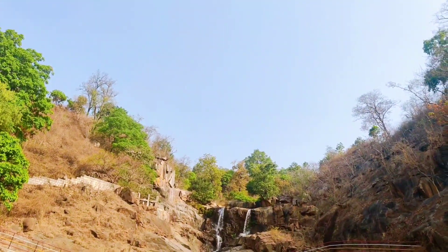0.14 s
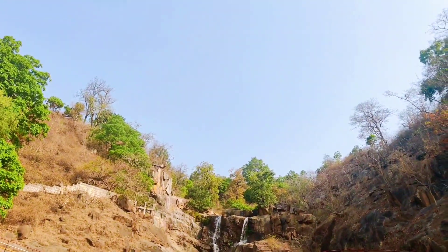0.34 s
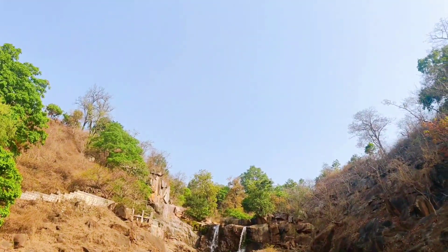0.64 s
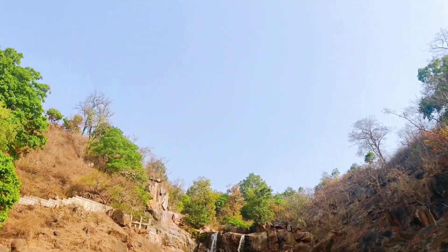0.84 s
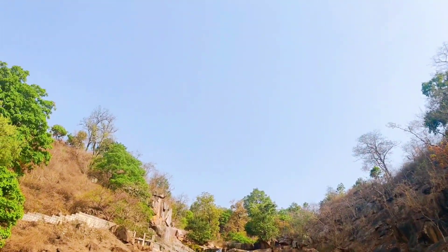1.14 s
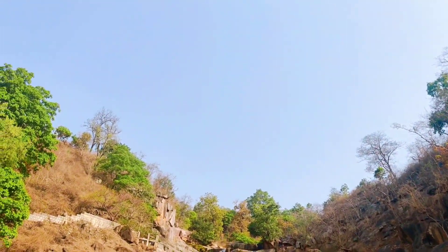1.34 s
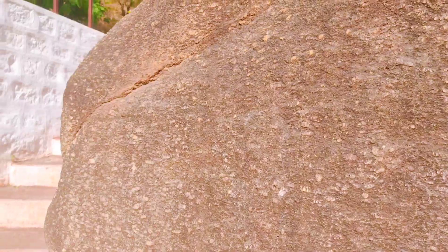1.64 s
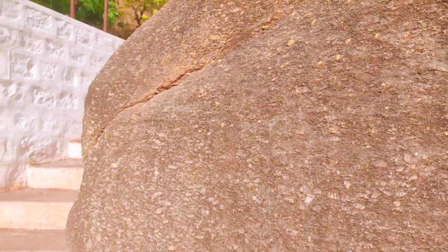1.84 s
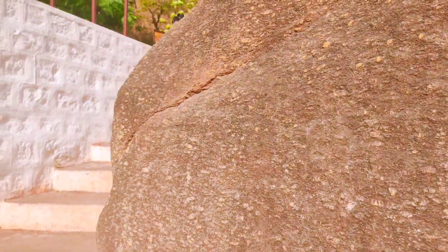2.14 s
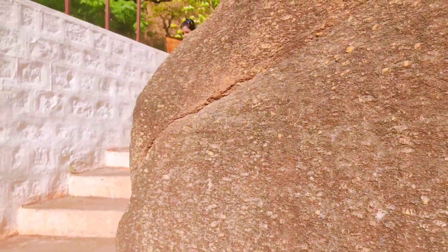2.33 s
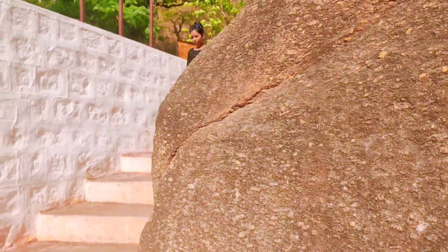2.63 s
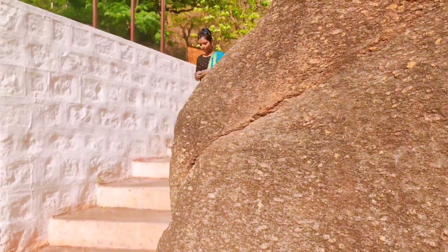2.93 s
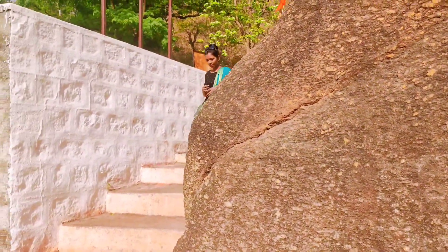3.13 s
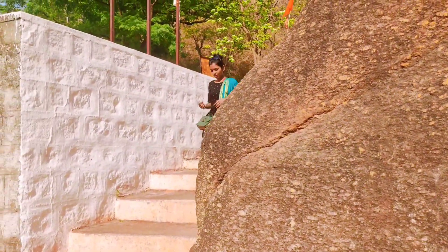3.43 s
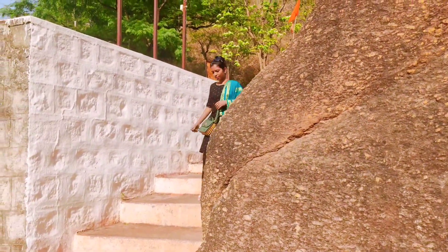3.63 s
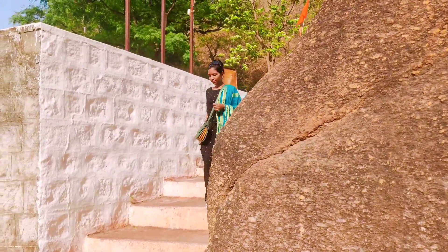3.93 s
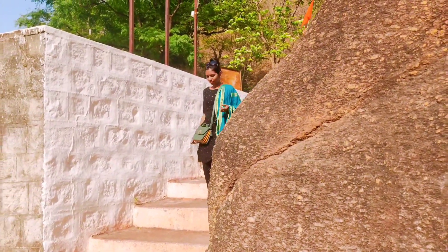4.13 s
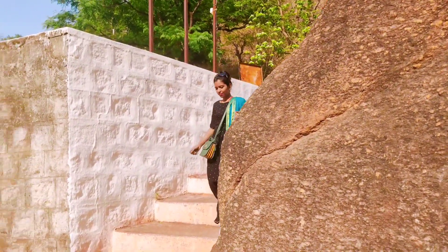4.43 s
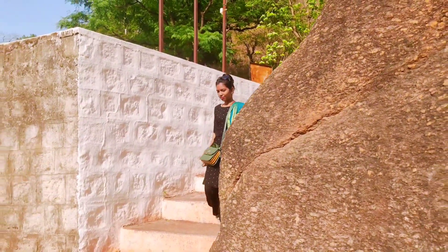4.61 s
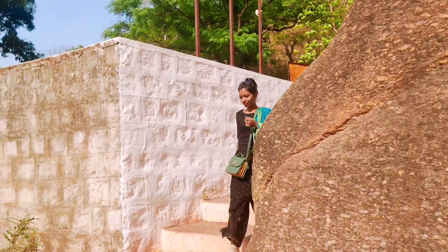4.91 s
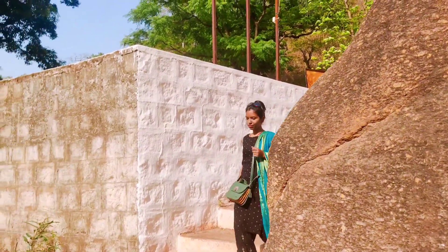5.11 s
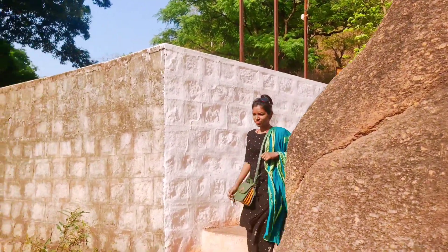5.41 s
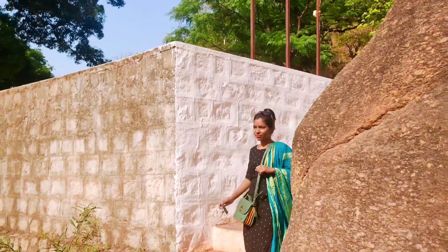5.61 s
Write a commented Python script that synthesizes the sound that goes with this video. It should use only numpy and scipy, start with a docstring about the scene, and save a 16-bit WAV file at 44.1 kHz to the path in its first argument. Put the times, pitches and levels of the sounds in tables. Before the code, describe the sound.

Full, bubbly water pours down rock, stops dead for a moment, and returns more distant among boulders, its treble opening near the end.

```python
"""A small waterfall rushes down a rock face, heard through two microphone ports a hand apart.
After a short silence the rush fades in again from one side, further off among boulders.
Foam noise and ringing bubbles in half-octave bands make the rush, direct and scattered by the rocks.
Gurgles and dull plops ring in it, spray and mist fizz on top, and a breeze and one puff rumble below."""
import sys
import numpy as np
from scipy import signal
from scipy.fft import rfft, irfft
from scipy.io import wavfile
from scipy.ndimage import uniform_filter1d, map_coordinates

SR = 44100
rng = np.random.default_rng(int(sys.argv[2]) if len(sys.argv) > 2 else 0)


def digitize_waveform(pressure):
    """Quantize a signal to 16-bit integers and store it at the path in sys.argv[1].

    Rows of a 2-D input are taken as channels; values are limited to [-1, 1].
    """
    field = np.atleast_2d(pressure).T
    bounded = np.clip(field, -1, 1)
    quanta = np.round(bounded * 32767).astype(np.int16)
    wavfile.write(sys.argv[1], SR, quanta)


N = 254016

# spectrum of the rush at each spot, ahead of the port colours: freq_hz, density_db (dB per Hz)
FRONT_RUSH = [(20, -70), (58, -58.5), (90, -58.5), (140, -58.5), (185, -66.5), (280, -60.5), (380, -63.5),
              (680, -63.5), (950, -68.5), (1600, -69), (3200, -66), (4200, -77), (4800, -73), (5600, -76),
              (7000, -85), (15500, -110)]
ASIDE_RUSH = [(20, -76), (42, -67.5), (80, -60), (200, -65), (270, -65.5), (500, -67), (760, -67.5),
              (980, -70.5), (1400, -72), (2100, -72), (3300, -74), (4400, -74.5), (5600, -80), (7000, -82),
              (9500, -109)]
# direct water relative to scattered water at each spot: freq_hz, ratio_db
FRONT_DIRECT = [(200, -2.5), (700, 7.0), (1700, -6.0), (2400, 8.5), (3100, -7), (3900, 3), (4500, -12.5)]
ASIDE_DIRECT = [(250, 7.0), (750, 9), (1300, 6.0), (2400, 1.0), (3400, 0.5), (5200, -0.5)]
# colour of each port; the left duct rings near 5 kHz: freq_hz, gain_db
LEFT_PORT = [(3500, -0.5), (3900, -2), (4220, -7.5), (4520, -0.8), (4820, 2.5), (5200, 0), (5900, -14.5),
             (8000, -14)]
RIGHT_PORT = [(100, -3.5), (2400, -3.5), (3600, -3.5), (4250, -8), (4750, -4.5), (5300, -1.8), (6000, -4.5),
              (9000, -7.5)]
# further colour of the rush on the right, at each spot: freq_hz, gain_db
FRONT_RIGHT = [(900, 0), (1800, -2.5), (2500, 0.3), (3050, -5.5), (3850, 4.5), (4250, 2.5), (5000, -1)]
ASIDE_RIGHT = [(850, 0), (1250, 0), (1750, -0.8), (2250, 0.5), (2800, 0.4), (3400, 0.3), (4200, -0.8),
               (5000, 0.6)]
# close reflection into the right port, ahead of its own colour: time_s, lag_ms, level_db
REFLECTION = [(1.9, 1.06, -22), (3.1, 1.24, -7), (3.6, 1.12, -17), (4.4, 1.05, -18), (5.2, 0.7, -28)]
# colour of that reflection: freq_hz, gain_db
REFLECTION_COLOUR = [(450, -14), (900, -4), (1900, 16.5), (3000, -1), (6000, -8)]
# dull plops that stand out of the rush, level ahead of the soft onset: start_s, pitch_hz, level_db, t60_s
PLOPS = [(2.552, 453, -29, 0.099), (2.838, 1230, -40, 0.06), (5.186, 171, -23, 0.049)]
# fine spray and the thinner mist above it, ahead of the level settings: freq_hz, density_db (dB per Hz)
SPRAY = [(4500, -112), (5700, -80.5), (6400, -80), (8100, -80), (9100, -86), (10200, -97.5), (12000, -118)]
MIST = [(7000, -120), (9500, -104), (11300, -100.5), (13000, -102), (15500, -106)]
# spells in which the spray's level shifts, values for its lower part: start_s, end_s, left_db, right_db
SPRAY_SPELLS = [(.72, 1.0, 0.5, -2.5), (3.197, 5.762, -1.5, -6.5)]
# low wind rumble, ahead of its gusts: freq_hz, density_db (dB per Hz)
BREEZE = [(25, -76.0), (55, -69.5), (120, -96.5), (400, -115), (2000, -150)]
# shapes of the bands that move: freq_hz, share_db (how much of the band is lifted)
RIGHT_TREBLE = [(700, -32), (1400, 0), (2400, 2.5), (3400, -2.5), (4300, -11.0), (5300, 9.0), (6200, -20)]
LEFT_MIDDLE = [(400, -9), (1500, -16), (2700, 2.5), (3600, 1), (4200, -26)]
LEFT_DUCT = [(3000, -30), (3950, 2), (4800, 2.5)]
DEEP_BASS = [(12, -20), (40, -1), (110, 0), (220, -19), (600, -50)]

CUT_S = 1.5  # the spot changes here, during the pause
PORT_GAP_S = 0.00041  # sound's travel time from one port to the other
# the sound stops dead, then fades back in at the second spot
STOP_S, RESUME_S, FADE_IN_S = 1.404, 1.605, 0.31
FADE_CURVE = 0.79  # below 1 the fade rises fastest at its start
PAUSE_DB, RESUME_DB = -80, -31.5  # gain during the pause, and where the fade starts
BASS_LATE_DB, BASS_LATE_S = -14, 0.25  # bass band's extra drop at first, and time to catch up
TOP_HZ = 15700  # the sound ends above this
# lag of the left port: nearly none in front; aside, a quick swing and a slow turn each shorten it
FRONT_LAG_MS, ASIDE_LAG_MS, SWING_MS, TURN_MS = -0.03, 0.4773, 0.077, 0.07
SWING_S, SWING_LENGTH_S = 3.09, 0.23
# late on, the ports turn towards the water and the short waves reach them better
TURN_S, TURN_LENGTH_S = 4.99, 0.73
OPEN_S, OPEN_LENGTH_S = 4.6, 0.96  # the right port's treble opens up a little sooner
TURN_SHADOW_DB, TURN_DUCT_DB = -2, 4.5  # drive of the left middle and left duct bands
TURN_TREBLE_DB, TURN_SPRAY_DB, TURN_MIST_DB = 4, 5, 5.5  # drive of right treble; gain of left spray, mist
# the duct band is also driven in front, and on arrival among the boulders until it settles
FRONT_DUCT_DB, ARRIVAL_DUCT_DB, SETTLE_S = 1, 2, 2.4
# larger bubbles in the pool: pitch range, cycles of ring, share by which the pitch rises
GURGLE_LOW_HZ, GURGLE_HIGH_HZ, GURGLE_CYCLES, GURGLE_RISE = 200, 1480, 41, 0.078
# ahead of onset and port colour: top level, range below it, change from low to high pitch
GURGLE_DB, GURGLE_SPREAD_DB, GURGLE_TILT_DB = -35, 9.5, -6
# spray and mist offsets: (in front, among the boulders)
SPRAY_LEFT_DB, SPRAY_RIGHT_DB, MIST_DB = (-5.2, -11.5), (-1.6, -1.4), (3, -3.5)
MIST_SIDE_DB = -10.5  # the part of the mist that differs between the ports, against the shared part
# above about 8.2 kHz the spray's level shifts three times as many dB during its spells
SPELL_TOP_HZ, SPELL_WIDTH_HZ, SPELL_TOP_FACTOR = 8200, 300, 3
SPELL_EDGE_S = 0.18  # time for the level to pass into or out of a spell
PUFF_S, PUFF_DB, PUFF_ATTACK_S, PUFF_RELEASE_S = 1.76, -19.5, 0.05, 0.26  # level ahead of the envelope


def direct():
    """The foot of the fall in line of sight, where foam and bubbles surge together."""
    water = churn(bubble_share=0.33, per_s=400, cycles=7.9, spread_db=3.5, flicker_db=1.0, flicker_rate=26)
    return at_ports(water * slosh(swell_db=-0.33, splash_db=0.68, splash_rate=50))


def scattered():
    """The rocks return the rush from all sides: alike at both ports only for long waves."""
    mid, side = (
        churn(bubble_share=0.27, per_s=500, cycles=4.9, spread_db=3, flicker_db=2.0, flicker_rate=28)
        for _ in range(2)
    )
    likeness = np.sinc(2 * freqs() * PORT_GAP_S)
    mid = irfft(rfft(mid) * np.sqrt((1 + likeness) / 2), N)
    side = irfft(rfft(side) * np.sqrt((1 - .96 * likeness) / 2), N)
    return np.array([mid + side, mid - side])


def rush(near, far, spectrum, direct_db):
    """Direct and scattered water mix by frequency, then take the spectrum of one spot."""
    hz, db = np.transpose(direct_db)
    ratio = undb(np.interp(np.log(freqs()), np.log(hz), db))
    mixed = (rfft(near) * ratio + rfft(far)) / np.sqrt(1 + ratio ** 2)
    return colour(irfft(mixed, N), spectrum)


def churn(bubble_share, per_s, cycles, spread_db, flicker_db, flicker_rate, count=18):
    """White water near 0 dB per Hz: bands of foam noise and bubbles, each flickering on its own."""
    foam, out = rfft(rng.standard_normal(N)) * np.sqrt(SR / 2), 0
    edges = np.r_[0, np.geomspace(45, 16000, count)]  # half octaves above one bass band
    share = np.clip(bubble_share, 0, 1)
    for lo, hi in zip(edges[:-1], edges[1:]):
        band = irfft(foam * ((freqs() >= lo) & (freqs() < hi)), N)
        rings = np.sqrt(hi - lo) * bubbles((lo + hi) / 2, per_s, cycles, spread_db)
        mixed = np.sqrt(1 - share) * band + np.sqrt(share) * rings
        out = out + mixed * undb(flicker_db * walk(flicker_rate))
    return out


def bubbles(hz, per_s, cycles, spread_db):
    """Bubbles of one size ring at random; small ones are more numerous and most are faint."""
    number = int(per_s * np.sqrt(hz / 1000) * N / SR) + 1  # per_s holds at 1 kHz
    chance = rng.random((number, 3))
    strength = undb(-spread_db * np.log(np.maximum(chance[:, 1], .005)))
    polarity = np.sign(chance[:, 2] - .5)
    births = np.bincount((chance[:, 0] * N).astype(int), strength * polarity, N)
    # a resonator that falls 60 dB in the given cycles
    pole = np.exp((2j * np.pi - np.log(1000) / cycles) * hz / SR)
    ring = signal.lfilter([1, 0, -1], [1, -2 * pole.real, abs(pole) ** 2], births)
    return ring / ring.std()


def slosh(swell_db, splash_db, splash_rate):
    """The flow swells slowly, and lumps of water land in quick splashes: two random gains."""
    return undb(swell_db * walk(3.68) + splash_db * walk(splash_rate))


def reflection(x):
    """A close surface mirrors the rush, inverted and late; its comb of hollows slides with the lag."""
    t = np.arange(N) / SR
    s, lag_ms, db = np.transpose(REFLECTION)
    mirrored = colour(x, REFLECTION_COLOUR)
    return -delay(mirrored, np.interp(t, s, lag_ms)) * undb(np.interp(t, s, db))


def gurgles(count=90):
    """Larger bubbles ring at random in the pool, each rising a little in pitch as it decays."""
    out, age = np.zeros(N + SR), np.arange(SR // 4) / SR
    for when, pitch, size in rng.random((count, 3)):
        hz = GURGLE_LOW_HZ * (GURGLE_HIGH_HZ / GURGLE_LOW_HZ) ** pitch
        start = int(when * N)
        life = age * hz / GURGLE_CYCLES
        rise = 1 + GURGLE_RISE * np.minimum(life, 1) / 2
        ring = np.sin(2 * np.pi * hz * age * rise) * (1 - np.exp(-age * hz))
        level = undb(GURGLE_DB - GURGLE_SPREAD_DB * size + GURGLE_TILT_DB * pitch)
        out[start:start + len(age)] += ring * np.exp(-np.log(1000) * life) * level
    return at_ports(out[:N])


def plops():
    """A few short decaying sines with soft onsets, a little stronger on the left."""
    out = 0
    for s, hz, db, t60 in PLOPS:
        age = np.maximum(np.arange(N) / SR - s, 0)
        onset = 1 - np.exp(-age / 0.0016)
        decay = np.exp(-np.log(1000) * age / t60)
        out = out + undb(db) * np.sin(2 * np.pi * hz * age) * onset * decay
    return out * undb([[0], [-2.5]])


def spray():
    """Fine drops patter on wet rock; in spells the fizz's level shifts, its top shifting more than the rest."""
    drops = churn(bubble_share=0.27, per_s=650, cycles=9.1, spread_db=4.5, flicker_db=2.0, flicker_rate=43)
    drops = drops * slosh(swell_db=0.5, splash_db=1.4, splash_rate=60)
    left_db = by_spot(*SPRAY_LEFT_DB) + TURN_SPRAY_DB * turn()
    port_db = np.array([left_db, by_spot(*SPRAY_RIGHT_DB)])
    spell_db = 0
    for start, end, left, right in SPRAY_SPELLS:
        spell = ramp(start, SPELL_EDGE_S) - ramp(end, SPELL_EDGE_S)
        spell_db = spell_db + np.outer([left, right], spell)
    fizz = colour(drops, SPRAY)
    # during these spells the level mostly drops, and drops more above about 8.2 kHz
    top = irfft(rfft(fizz) * (1 + np.tanh((freqs() - SPELL_TOP_HZ) / SPELL_WIDTH_HZ)) / 2, N)
    shifted = (fizz - top) * undb(spell_db) + top * undb(SPELL_TOP_FACTOR * spell_db)
    return shifted * undb(port_db)


def mist():
    """The smallest droplets crackle thinly, partly apart at the two ports."""
    shared, apart = (
        churn(bubble_share=0.35, per_s=600, cycles=13, spread_db=3.8, flicker_db=1.8, flicker_rate=60)
        for _ in range(2)
    )
    droplets = shared + np.outer([1, -1], apart) * undb(MIST_SIDE_DB)
    droplets = droplets * slosh(swell_db=0.5, splash_db=1.7, splash_rate=70)
    return colour(droplets, MIST) * undb(by_spot(*MIST_DB) + TURN_MIST_DB * turn())


def puff():
    """A puff of air presses on the left port and leaks away: a soft, very low thump."""
    age = np.maximum(np.arange(N) / SR - PUFF_S, 0)
    swell = (1 - np.exp(-age / PUFF_ATTACK_S)) ** 2
    push = undb(PUFF_DB) * swell * np.exp(-age / PUFF_RELEASE_S)
    return np.outer([1, 0], push)


def breeze():
    """A light breeze rumbles with separate noise on each port, gusting alike on both."""
    eddies = rng.standard_normal((2, N)) * np.sqrt(SR / 2) * undb(2.0 * walk(5.5))
    return colour(eddies, BREEZE)


def at_ports(x):
    """Sound in line of sight reaches one port before the other."""
    aside_ms = ASIDE_LAG_MS - SWING_MS * ramp(SWING_S, SWING_LENGTH_S) - TURN_MS * turn()
    return np.array([delay(x, by_spot(FRONT_LAG_MS, aside_ms)), x])


def turn():
    """How far the ports have turned towards the water, 0 to 1."""
    return ramp(TURN_S, TURN_LENGTH_S)


def by_spot(front, aside):
    """One value in front of the fall, the other among the boulders."""
    return np.where(np.arange(N) / SR < CUT_S, front, aside)


def ramp(start_s, length_s):
    """An even rise from 0 to 1."""
    return np.clip((np.arange(N) / SR - start_s) / length_s, 0, 1)


def walk(rate):
    """Random levels held 1 / rate s and smoothed twice; spread near 1."""
    k = max(int(SR / rate), 1)
    held = np.repeat(rng.standard_normal(N // k + 2), k)
    return 1.3 * uniform_filter1d(uniform_filter1d(held, k), k)[:N]


def delay(x, lag_ms):
    """Hear x late by a lag that may move."""
    return map_coordinates(x, [np.arange(N) - lag_ms * SR / 1000], order=3, mode="nearest")


def lift(x, band, db):
    """Raise or lower one band of x by adding a coloured copy, at a level that may move."""
    return x + (undb(db) - 1) * colour(x, band)


def colour(x, points):
    """Filter by (Hz, dB) points on a log-frequency axis."""
    hz, db = np.transpose(points)
    return irfft(rfft(x) * undb(np.interp(np.log(freqs()), np.log(hz), db)), N)


def freqs():
    """Frequency of each spectral bin in Hz, at least 1."""
    return np.maximum(np.arange(N // 2 + 1) * SR / N, 1)


def undb(db):
    """Decibels to gain."""
    return 10 ** (np.asarray(db) / 20)


def scene():
    """The fall from two spots through the colour of the two ports, with spray, plops and air on top."""
    near, far = direct(), scattered()
    front = rush(near, far, FRONT_RUSH, FRONT_DIRECT)
    aside = rush(near, far, ASIDE_RUSH, ASIDE_DIRECT)
    left = by_spot(front[0], aside[0])
    aside_right = aside[1] + reflection(aside[1])
    right = by_spot(colour(front[1], FRONT_RIGHT), colour(aside_right, ASIDE_RIGHT))
    # as the ports turn, the treble opens up on the right while the left falls slightly into shadow
    right = lift(right, RIGHT_TREBLE, TURN_TREBLE_DB * ramp(OPEN_S, OPEN_LENGTH_S))
    left = lift(left, LEFT_MIDDLE, TURN_SHADOW_DB * turn())
    arrival = by_spot(0, 1 - ramp(RESUME_S, SETTLE_S))
    duct_db = TURN_DUCT_DB * turn() + ARRIVAL_DUCT_DB * arrival + by_spot(FRONT_DUCT_DB, 0)
    left = lift(left, LEFT_DUCT, duct_db)
    pool = gurgles()
    water = np.array([colour(left + pool[0], LEFT_PORT), colour(right + pool[1], RIGHT_PORT)])
    return water + spray() + mist() + plops() + breeze() + puff()


def record(dry):
    """The sound pauses, fades in with the deep bass last, and loses its very top."""
    t = np.arange(N) / SR
    start = undb(RESUME_DB)
    rise = start + (1 - start) * ramp(RESUME_S, FADE_IN_S) ** FADE_CURVE
    fade_in = np.where(t < RESUME_S, undb(PAUSE_DB), rise)
    thinned = lift(dry, DEEP_BASS, BASS_LATE_DB * (1 - ramp(RESUME_S, BASS_LATE_S)))
    joined = np.where(t < STOP_S, dry, thinned * fade_in)
    low_pass = signal.ellip(10, .1, 80, TOP_HZ, fs=SR, output="sos")
    return signal.sosfilt(low_pass, joined)


dry = scene()
out = record(dry)
digitize_waveform(out)
```